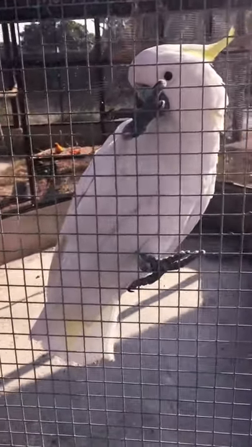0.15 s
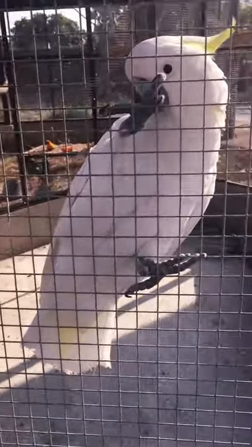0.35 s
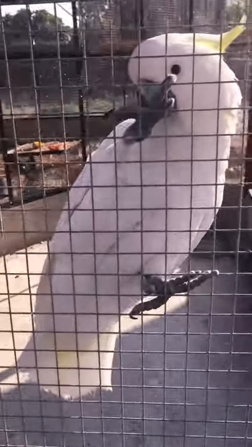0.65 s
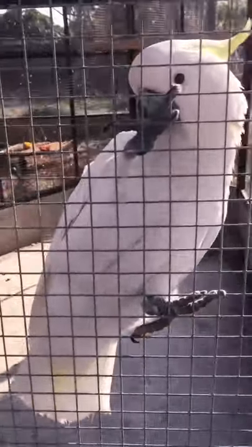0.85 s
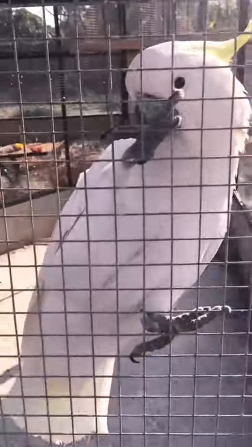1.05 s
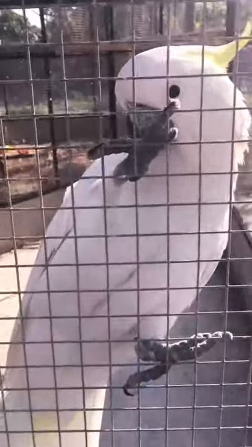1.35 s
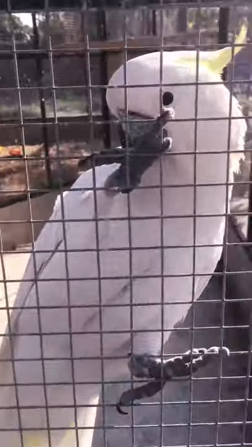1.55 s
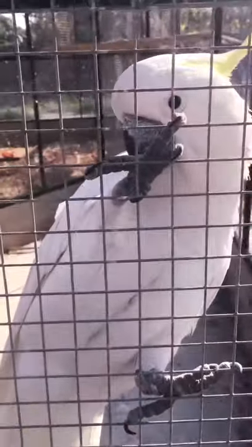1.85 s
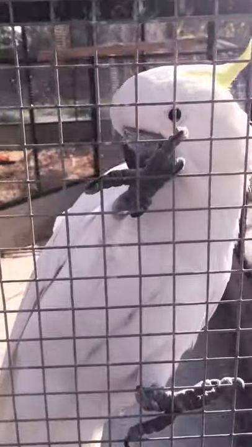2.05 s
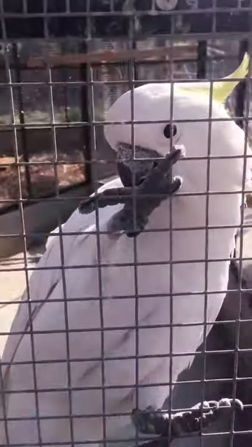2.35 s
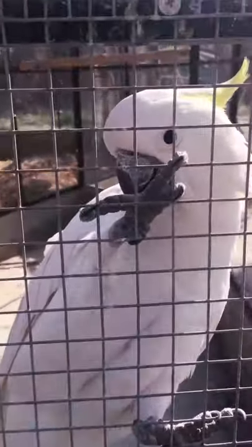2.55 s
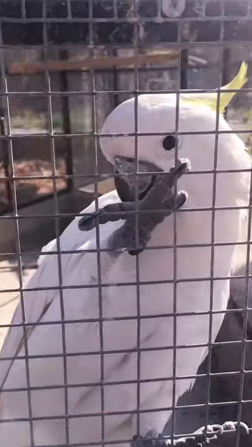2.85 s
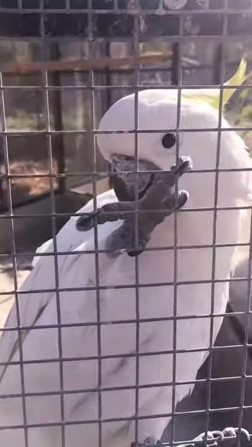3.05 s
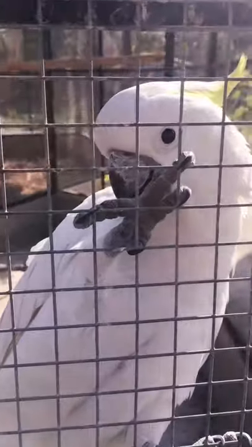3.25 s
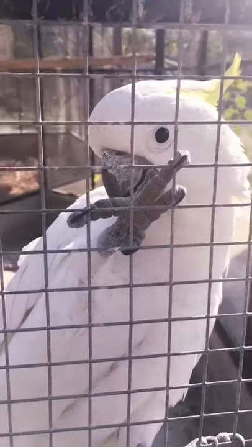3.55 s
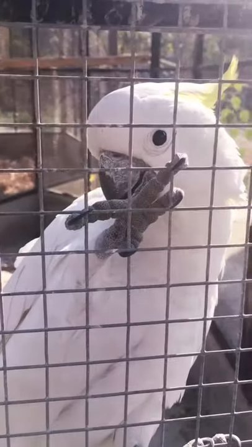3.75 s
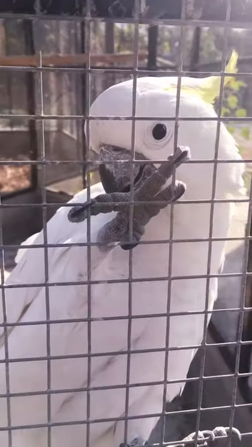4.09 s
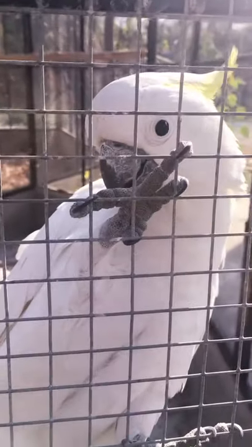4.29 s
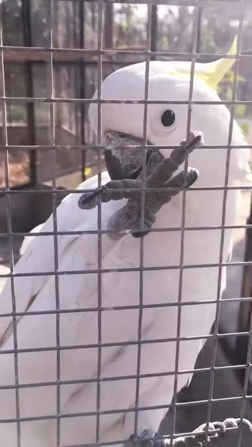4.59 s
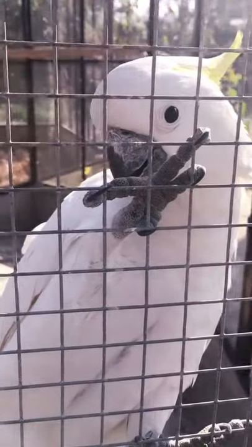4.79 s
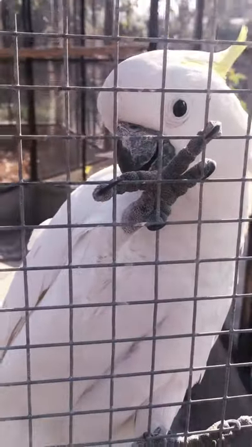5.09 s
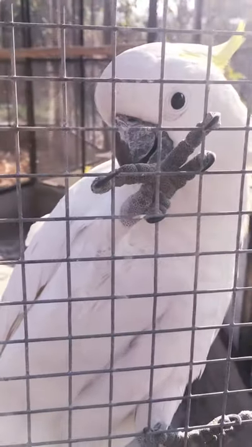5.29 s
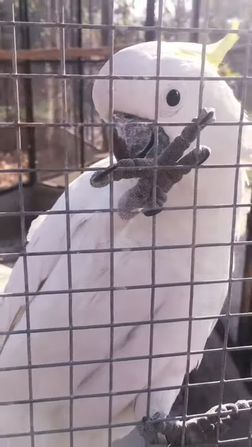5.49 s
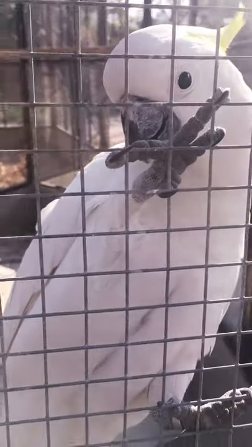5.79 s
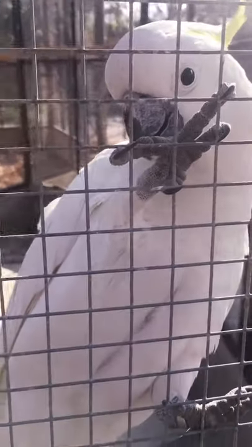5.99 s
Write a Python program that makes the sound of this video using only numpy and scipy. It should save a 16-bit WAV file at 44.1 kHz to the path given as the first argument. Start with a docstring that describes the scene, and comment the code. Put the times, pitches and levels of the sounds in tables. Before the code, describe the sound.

A crisp beak crack opens over faint air, low wavering hum and distant bird cries. Thin shrieks come first, then harsh screeches that grow into a loud run around two seconds. A falling whistle, low squawks and thinner shrieks follow more sparsely, with close food cracks and crumb ticks. A last screech and a sudden close croak end it. Calls ring briefly off the pens; the beak is close to the microphone.

```python
"""A low, wavering machine hum and soft air open the scene, with far birds calling over them.
The bird at the wire cracks food in its beak; a burst of crumb ticks follows late on.
Cockatoos in the aviary give thin shrieks, harsh screeches, falling whistles and lower squawks:
a syrinx claps once a cycle into a throat filter, unevenly where the voice rasps.
A close croak starts at the end. The walls of the pens ring after every call."""
import sys
import numpy as np
from scipy import signal
from scipy.fft import rfft, irfft, next_fast_len
from scipy.io import wavfile
from scipy.ndimage import uniform_filter1d, map_coordinates

SR = 44100
rng = np.random.default_rng(int(sys.argv[2]) if len(sys.argv) > 2 else 0)


def to_wav(s):
    """Save 16-bit WAV."""
    ch = np.atleast_2d(s).T  # columns
    pcm = np.round(np.clip(ch, -1, 1) * 32767)  # PCM
    wavfile.write(sys.argv[1], SR, pcm.astype(np.int16))


N = 270333
TOP_HZ = 15950  # upper edge of the whole scene


def amp(db):
    """Decibels to gain."""
    return 10 ** (np.asarray(db) / 20)


def unit(x):
    """x at rms 1."""
    return x / np.sqrt(np.mean(x ** 2) + 1e-20)


def steady(x, size=900):
    """x at a running rms of 1, over a window of size samples."""
    power = np.abs(uniform_filter1d(x ** 2, size))
    return x / np.sqrt(power + 1e-6 * power.mean() + 1e-20)


def along(points, hz):
    """Read (f/Hz, value) points on a log frequency axis."""
    f, v = np.transpose(points)
    return np.interp(np.log(hz + 1), np.log(f + 1), v)


def wobble(rate, n):
    """A smooth random curve of n samples, rate knots a second."""
    knots = rng.standard_normal(int(n * rate / SR) + 4)
    return map_coordinates(knots, [np.arange(n) * rate / SR])


def add(track, s, x):
    """Mix x into the track at time s."""
    part = track[max(0, round(s * SR)):][:len(x)]
    part += x[:len(part)]


def coloured(x, points):
    """x through a causal minimum-phase filter with the given (f/Hz, level/dB) shape."""
    m = 2 * next_fast_len(len(x) // 2 + 2048)
    cepstrum = irfft(np.log(amp(along(points, np.fft.rfftfreq(m, 1 / SR)))))
    # folding the cepstrum forward in time makes the filter causal
    cepstrum[1:m // 2] *= 2
    cepstrum[m // 2 + 1:] = 0
    return irfft(rfft(x, m) * np.exp(rfft(cepstrum)))[:len(x)]


def band(x, hz, kind, order=3):
    """The part of x below ("low") or above ("high") an edge."""
    return signal.sosfiltfilt(signal.butter(order, hz, kind, fs=SR, output="sos"), x)


def faded(x, fade):
    """x with soft ends, fade seconds each."""
    t = np.arange(len(x)) / SR
    return x * np.clip(np.minimum(t, t[::-1]) / fade, 0, 1)


def ramp(t, span):
    """1 at t = 0, falling to 0 at t = span."""
    return np.clip(1 - t / span, 0, 1)


def pulses(at, sizes, n):
    """Band-limited pulses at fractional sample positions."""
    taps = np.floor(at)[:, None] + np.arange(-7, 9)
    d = taps - at[:, None]
    shape = np.sinc(d) * np.cos(np.pi * d / 16) ** 2
    slots = np.clip(taps, 0, n).astype(int)
    return np.bincount(slots.ravel(), (sizes[:, None] * shape).ravel(), n + 1)[:n]


AIR_DB = -55
# spectrum of the outdoor air, relative: (f/Hz, level/dB per Hz)
AIR_SPECTRUM = [(20, -41), (35, -11.5), (55, 7.5), (90, -4), (130, -9.5), (230, -9), (350, -15.5),
                (500, -17), (900, -14.5), (2100, -20.5), (3900, -19), (5000, -22.5), (7000, -30),
                (15500, -41)]
# hum lines of the machines: (f/Hz, rms level at first/dB, rms level at last/dB)
HUM_LINES = [(57.2, -65.5, -76), (72, -84.5, -48.5), (163.7, -59, -84.5), (221, -72, -78.5),
             (325, -69, -102)]


def background():
    """Soft outdoor air is coloured noise; the machine hum is sine lines wavering in phase and level."""
    t = np.arange(N) / SR
    noise = unit(coloured(rng.standard_normal(N), AIR_SPECTRUM))
    air = amp(AIR_DB + 0.68 * wobble(3.8, N)) * noise
    hum = np.zeros(N)
    for hz, first_db, last_db in HUM_LINES:
        line = unit(np.sin(2 * np.pi * hz * t + 0.26 * wobble(28, N)))
        level = first_db + (last_db - first_db) * t / t[-1] + 0.36 * wobble(4.7, N)
        hum += amp(level) * line
    return air + hum


# far cries: (t/s, length/s, first f/Hz, last f/Hz, level mid-call before the distance filter/dB,
#  step from overtone to overtone/dB, hoarseness as a share of the pitch)
FAR_CRIES = [ (0.0, 0.15, 733, 632, -55, 1, 0.017), (0.481, 0.085, 1070, 936, -61, -8, 0.03),
             (0.659, 0.17, 768, 627, -49.5, 2.5, 0.006), (2.922, 0.22, 1568, 1230, -35, 3.5, 0.031),
             (3.481, 0.136, 895, 887, -39.5, 2.5, 0.037), (3.596, 0.23, 906, 868, -58.5, -4, 0.045),
             (4.384, 0.061, 3680, 3900, -47, -37, 0.003), (4.44, 0.082, 3810, 3740, -52, -35, 0.003),
             (5.703, 0.056, 810, 1026, -55.5, -13, 0.077), (5.78, 0.11, 1078, 911, -46, -5, 0.089)]
# far coos: (t/s, length/s, f/Hz, level mid-call before the distance filter/dB)
FAR_COOS = [(0.0, 0.23, 223, -61), (0.683, 0.18, 253.3, -59), (2.628, 0.16, 261.6, -63),
            (5.696, 0.23, 219, -64.5)]
COO_STEP_DB, COO_HOARSENESS = -22, 0.02  # from overtone to overtone; share of the pitch
FAR_ARCH_DB = 4.5  # a far call swells by this much to its middle and fades again
# tone colour left by the way from the far birds: (f/Hz, level/dB)
DISTANCE_COLOUR = [(2000, 4.5), (4000, -8), (5500, -11), (9000, -52)]


def far_birds(count=8):
    """Distant cries, coos and peeps: hoarse, wavering tones of up to count harmonics, dulled by distance."""
    track = np.zeros(N)
    coos = [(s, length, hz, hz, db, COO_STEP_DB, COO_HOARSENESS) for s, length, hz, db in FAR_COOS]
    for s, length, first_hz, last_hz, db, step_db, hoarse in FAR_CRIES + coos:
        u = np.linspace(0, 1, int(length * SR))
        pitch = first_hz * (last_hz / first_hz) ** u
        waver = hoarse * wobble(298.8, len(u)) + 0.0138 * wobble(45.3, len(u))
        phase = 2 * np.pi * np.cumsum(pitch * (1 + waver)) / SR
        tone = np.zeros(len(u))
        for k in range(count):
            audible = (k + 1) * pitch < TOP_HZ
            tone += amp(k * step_db) * np.sin((k + 1) * phase) * audible
        level = db - FAR_ARCH_DB * (2 * u - 1) ** 2
        add(track, s, faded(amp(level) * unit(tone), fade=0.026))
    return coloured(track, DISTANCE_COLOUR)


# beak cracks: (t/s, peak level/dB, level of the knock against the snap before BODY_LIFT_DB/dB)
BEAK_CRACKS = [(0.0278, -23, -11.5), (0.8075, -36, -9.5), (3.6333, -38.5, -7), (3.7353, -21, -12.5),
               (3.821, -29, -23), (4.522, -42, 1), (4.5684, -34.5, -23), (4.668, -38, -25),
               (4.6958, -35, -30), (4.785, -40, -21), (5.757, -36, 3)]
BODY_LIFT_DB = 8.5
# colour of the snapping food: (f/Hz, level/dB)
SNAP_COLOUR = [(1500, 5), (4000, -2), (6500, 8), (10000, 6), (16000, 0.5)]
# colour of the knocking beak: (f/Hz, level/dB)
BEAK_COLOUR = [(300, -13), (900, -40), (1700, 5.5), (2400, -12), (3300, 0), (4500, -2.5), (8000, -30)]


def beak(count=30):
    """Food snaps in the beak, which knocks with it; small crumbs tick as the bird chews: all decaying noise."""
    track, t = np.zeros(N), np.arange(SR // 10) / SR

    def burst(t60, colour):
        """Noise that dies by 60 dB in t60 seconds."""
        return coloured(rng.standard_normal(len(t)) * amp(-60 * t / t60), colour)

    for s, db, body_db in BEAK_CRACKS:
        snap = unit(burst(0.018, SNAP_COLOUR))
        knock = unit(burst(0.0083, BEAK_COLOUR))
        crack = snap + amp(body_db + BODY_LIFT_DB) * knock
        add(track, s, amp(db) * crack / np.abs(crack).max())
    for when, size in rng.random((count, 2)):
        tick = burst(0.013, SNAP_COLOUR)
        tick = amp(-48.5 + 13.7 * size ** 2) * tick / np.abs(tick).max()
        add(track, 4.49 + .32 * when, tick)
    return track


def beats(pitch):
    """Sample positions at which each cycle starts."""
    cycles = np.cumsum(pitch) / SR
    return np.interp(np.arange(cycles[-1]), cycles, np.arange(len(pitch)))


def windpipe(x, smear=0.001647, top_hz=8000):
    """The windpipe spreads each clap in time: delay grows with frequency, to smear seconds at top_hz."""
    m = next_fast_len(len(x) + 1024)
    hz = np.fft.rfftfreq(m, 1 / SR)
    return irfft(rfft(x, m) * np.exp(-1j * np.pi * smear * hz ** 2 / top_hz), m)[:len(x)]


def call(controls, throats, tremor, flutter, jitter, scatter_db, hiss,
         treble_hz=6500, mellow_hz=2100, soft_db=-31.0):
    """The syrinx claps once a cycle into the throat; rasp makes the claps uneven in time and size."""
    pitch, db, treble_db, rasp, *half_db = controls
    n, rasp = len(pitch), np.clip(rasp, 0, 1)
    unrest = (tremor + flutter * rasp) * (wobble(420, n) + .8 * wobble(110, n))
    at = beats(pitch * np.exp(unrest))
    here, count = at.astype(int), len(at)
    sizes = amp(scatter_db * np.sqrt(rasp[here]) * rng.standard_normal(count))
    if half_db:  # every other clap is stronger: lines appear halfway between the harmonics
        contrast = amp(half_db[0] + 3.0 * wobble(67.6, n))[here]
        sizes = sizes * (1 + contrast * (-1) ** np.arange(count))
    at = at + jitter * rasp[here] ** 2 * SR / pitch[here] * rng.standard_normal(count)
    claps = steady(windpipe(pulses(at, sizes, n)))
    air = hiss * np.sqrt(rasp) * rng.standard_normal(n)
    source = (claps + air) * amp((1.3 + 1.5 * rasp) * wobble(260, n))
    # the rougher the voice, the more the last throat shape takes over from the first
    slack = np.clip(2 * rasp - .7, 0, 1)
    voice = coloured((1 - slack) * source, throats[0]) + coloured(slack * source, throats[-1])
    # less effort gives a mellower voice
    softness = np.clip((soft_db - db) / 10, 0, 1)
    voice = voice + 1.96 * softness * band(voice, mellow_hz, "low")
    # a wider beak lets out more treble
    low, high = band(voice, treble_hz, "low"), band(voice, treble_hz, "high")
    balanced = steady(steady(low) + amp(treble_db) * steady(high))
    return faded(amp(db) * balanced, fade=.012)


def calls(table, gesture, shape, throats, **roughness):
    """Place all the calls of one kind on a track."""
    track = np.zeros(N)
    for s, *row in table:
        add(track, s, call(gesture(row, **shape), throats, **roughness))
    return track


RASP_TURN_S = 0.019  # time the voice takes to turn from rough to clear or back
WAVER_PER_S, WAVER_DB, WAVER_TREBLE_DB = 35, 0.27, 3  # a cry is never quite steady


def arch(row, scoop, drop, drop_s, attack_s, attack_db, release_db, split_db):
    """One cry: pitch scoops up, sags and drops; level attacks, swells and lets go; rasp changes once."""
    (length, top_hz, rise, sag, db, swell_db, release, treble_db, treble_swell_db,
     first_rasp, last_rasp, turn, half_db) = row
    t = np.arange(int(length * SR)) / SR
    left = length - t
    middle = t / length - .5  # -0.5 at the start, 0.5 at the end
    scooped = top_hz * (1 - scoop * ramp(t, rise) ** 2)
    sagged = scooped * 2 ** (-sag * np.maximum(t - rise, 0))
    pitch = sagged * (1 - drop * ramp(left, drop_s))
    level = db + swell_db * middle
    level = level - attack_db * ramp(t, attack_s) ** 2 - release_db * ramp(left, release)
    level = level + WAVER_DB * wobble(WAVER_PER_S, len(t))
    treble = treble_db + treble_swell_db * middle + WAVER_TREBLE_DB * wobble(WAVER_PER_S, len(t))
    opening = (first_rasp - last_rasp) * (1 - np.tanh((t - turn) / RASP_TURN_S)) / 2
    return pitch, level, treble, last_rasp + opening, half_db + split_db * opening


# thin shrieks: (t/s, length/s, top f/Hz, rise/s, sag/octaves per s, level mid-call/dB,
#  swell from start to end/dB, release/s, treble share/dB, treble swell/dB, opening rasp 0-1,
#  closing rasp 0-1, time of the rasp change/s, half-pitch lines before the split/dB)
SHRIEK_CALLS = [ (0.267, 0.12, 2300, 0.044, 0.32, -43, 7, 0.02, -9.5, -3, 1, 0.23, 0.022, -26),
                (0.375, 0.1, 2357, 0.0094, 0.33, -39, -5, 0.052, -3.5, -11, 0.6, 0.55, 0.037, -6),
                (3.42, 0.16, 2846, 0.1, 0.6, -34.5, 12.5, 0.071, -9, 0, 0.57, 0.32, 0.078, -16),
                (4.71, 0.11, 3830, 0.07, 0, -51.5, 4, 0.047, -13, 0, 0.79, 0.3, 0.067, -27),
                (4.8, 0.081, 4220, 0.0108, 0.051, -53.5, 6, 0.012, -15, 6, 0.6, 0.88, 0.0311, -12),
                (5.018, 0.17, 2620, 0.015, 0.066, -37.5, 7.5, 0.025, -10, -4, 0.56, 0.29, 0.13, -14)]
# start and end of a shriek: pitch shares lost at the start (scoop) and end (drop), ramp times/s,
# ramp depths/dB, and how much a rough opening strengthens the half-pitch lines (split)/dB
SHRIEK_ENDS = dict(scoop=0.17, drop=0.019, drop_s=0.032, attack_s=0.037, attack_db=2.5, release_db=22.5, split_db=-3)
# throat and beak colour of a clear shriek: (f/Hz, level/dB)
SHRIEK_CLEAR = [(900, -30.5), (1800, -17.5), (2500, -20), (3400, 7), (4500, 4), (5500, 4), (6400, -17.5),
                (8000, -15), (9800, -6.5), (11000, -31), (16000, -27)]
# throat and beak colour of a rasping shriek: (f/Hz, level/dB)
SHRIEK_ROUGH = [(900, -18), (1800, -28), (2450, 8.5), (3400, 10), (4500, 2.5), (5500, -5), (6400, -3.5),
                (7300, -9), (9800, -25), (11000, -20), (16000, -49)]


def shrieks():
    """Thin high cries: fast claps with strong jitter through a clear and a rough throat."""
    return calls(SHRIEK_CALLS, arch, SHRIEK_ENDS, [SHRIEK_CLEAR, SHRIEK_ROUGH],
                 tremor=.012, flutter=.06, jitter=.12, scatter_db=6, hiss=.25)


# harsh screeches, t/s to half-pitch lines/dB: columns and units as in SHRIEK_CALLS
SCREECH_CALLS = [ (0.903, 0.26, 1901, 0.22, 0.12, -42, 4.5, 0.032, -15.5, -27, 0.86, 0.29, 0.14, -13),
                 (1.377, 0.29, 2028, 0.13, 0.159, -30, -1, 0.0091, -5, 6.5, 0.9, 0.17, 0.12, -12),
                 (1.5, 0.185, 1661, 0.015, 0.09, -33.5, -26, 0.006, -9, -5, 0.79, 0.34, 0.067, -36),
                 (1.9, 0.23, 1889, 0.087, 0.082, -22, -1, 0.016, -11.5, 4, 0.99, 0.06, 0.024, -5.5),
                 (2.085, 0.21, 2266, 0.07, 1.25, -21, 6, 0.073, -5, 9, 0.43, 0.24, 0.082, -10.5),
                 (2.352, 0.31, 2133, 0.085, 0.55, -20.5, 7, 0.12, -7, 5, 0.8, 0.25, 0.053, -7.5),
                 (5.783, 0.19, 2071, 0.14, 0.84, -27, 5.5, 0.0087, -7, 11, 1, 0.28, 0.11, -12)]
# start and end of a screech: settings and units as in SHRIEK_ENDS
SCREECH_ENDS = dict(scoop=0.25, drop=0.122, drop_s=0.0306, attack_s=0.061, attack_db=18, release_db=16, split_db=4)
# throat and beak colour of a screech that sings clear: (f/Hz, level/dB)
SCREECH_CLEAR = [(400, -79), (700, -81), (1050, -26), (1500, -15), (2000, -4.5), (2500, -13), (3050, -4.5),
                 (3800, 1), (4350, 1), (4950, -7), (6200, -8), (8000, -17), (10000, -26.5), (16000, -43)]
# throat and beak colour of a screech that rasps: (f/Hz, level/dB)
SCREECH_ROUGH = [(400, -32), (650, -39), (950, -15), (1400, -3.5), (1900, -6), (2350, -1.5), (3200, 5),
                 (4000, -2), (4700, -6.5), (5600, -6), (8000, -14.5), (11000, -27.5), (16000, -47)]


def screeches():
    """Harsh high cries: the throat passes between its rough and its clear shape as the rasp changes."""
    return calls(SCREECH_CALLS, arch, SCREECH_ENDS, [SCREECH_CLEAR, SCREECH_ROUGH],
                 tremor=.004, flutter=.045, jitter=.07, scatter_db=5, hiss=.1)


# path of a whistle's pitch: (share of the length, share of the glide)
GLIDE_PATH = [(0, 0), (0.22, 0.17), (0.43, 0.55), (0.85, 0.89), (1, 1)]
WHISTLE_ATTACK_S, WHISTLE_ATTACK_DB = 0.017, 6


def glide(row):
    """One whistle: it slides from its first pitch to its last while its level changes steadily."""
    length, first_hz, last_hz, db, fade_db, treble_db, rasp = row
    t = np.arange(int(length * SR)) / SR
    pitch = first_hz * (last_hz / first_hz) ** np.interp(t / length, *np.transpose(GLIDE_PATH))
    level = db - fade_db * t / length - WHISTLE_ATTACK_DB * ramp(t, WHISTLE_ATTACK_S)
    return pitch, level, treble_db, np.full(len(t), rasp)


# whistles: (t/s, length/s, first f/Hz, last f/Hz, level before attack and fade/dB,
#  fade from start to end/dB, treble share/dB, rasp 0-1)
WHISTLE_CALLS = [ (2.75, 0.028, 2390, 2690, -33.5, 7, -22, 0.08),
                 (2.781, 0.169, 3143, 1172, -28.5, 17, -17, 0.01),
                 (4.14, 0.105, 1182, 882, -35, 16, -21, 0.04),
                 (4.875, 0.145, 1715, 1071, -50.5, -2.5, -22, 0.19)]
# throat and beak colour of a whistle: (f/Hz, level/dB)
WHISTLE_COLOUR = [(500, -33), (1000, -1.5), (1500, -15), (2200, 11), (2800, 4), (3800, 0.5), (6000, -10),
                  (8500, -19.5), (12000, -42), (16000, -39)]


def whistles():
    """Gliding, mostly falling calls with little rasp, through one throat shape."""
    return calls(WHISTLE_CALLS, glide, {}, [WHISTLE_COLOUR],
                 tremor=.01, flutter=.07, jitter=.15, scatter_db=6, hiss=.4)


# low squawks, t/s to half-pitch lines/dB: columns and units as in SHRIEK_CALLS
SQUAWK_CALLS = [ (3.223, 0.18, 664, 0.078, 0.095, -29, 5.8, 0.042, -6.5, 0, 0.13, 0.88, 0.11, -22),
                (3.92, 0.24, 723.4, 0.175, 0.36, -34.5, 12, 0.055, -12, -3, 0.17, 0.43, 0.17, -28),
                (5.238, 0.21, 700.7, 0.13, 0.325, -27.5, 6, 0.066, -7.5, 1, 0.58, 0.496, 0.092, -24)]
# start and end of a squawk: settings and units as in SHRIEK_ENDS
SQUAWK_ENDS = dict(scoop=0.36, drop=0.081, drop_s=0.03915, attack_s=0.088, attack_db=12, release_db=19.5, split_db=0)
# throat and beak colour of a squawk: (f/Hz, level/dB)
SQUAWK_COLOUR = [(300, -22), (500, -18.5), (700, -12), (1000, -2), (1400, -7.5), (2100, -1.5), (2900, 4.5),
                 (3600, 5), (4500, -3.5), (5500, 0), (8500, -13), (10800, -29.5), (13800, -28.5),
                 (16000, -33)]


def squawks():
    """Lower cries: slower claps and breathy hiss through one throat shape."""
    return calls(SQUAWK_CALLS, arch, SQUAWK_ENDS, [SQUAWK_COLOUR],
                 tremor=.005, flutter=.05, jitter=.06, scatter_db=3.5, hiss=.38)


# bursts of the close croak: (t/s, length/s, claps per s, level of the first clap/dB)
CROAK_BURSTS = [(6.088, 0.008, 209.6, -10), (6.1077, 0.025, 210, -11)]
# throat resonances of the croak: (f/Hz, width/Hz, level before weighting by the width/dB)
CROAK_RESONANCES = [(1326, 30, 24), (1690, 96, 3), (2890, 150, -4.5), (3700, 350, -27), (260, 180, -29)]
CROAK_FADE_DB_PER_S, CROAK_TOP_HZ = 292, 4940


def croak():
    """Short bursts of slow, fading claps, each ringing the throat, with one strong resonance."""
    track, t = np.zeros(N), np.arange(SR // 20) / SR
    ring = np.zeros(len(t))
    for hz, width, level in CROAK_RESONANCES:
        ring += amp(level) * width * np.exp(-np.pi * width * t) * np.sin(2 * np.pi * hz * t)
    ring = ring / np.abs(ring).max()
    for s, length, rate, db in CROAK_BURSTS:
        at = np.arange(0, length, 1 / rate)
        claps = pulses(at * SR, amp(db - CROAK_FADE_DB_PER_S * at), len(t))
        add(track, s, signal.fftconvolve(claps, ring))
    return band(track, CROAK_TOP_HZ, "low")


def walls(x, count=30):
    """Weak early copies from the floor and nearby walls."""
    out = np.zeros(N)
    for when, size in rng.random((count, 2)):
        add(out, .003 + .035 * when ** 1.5, x * (2 * size - 1))
    return out / np.sqrt(count)


# ringing of the pens: (f/Hz, time to fall by 60 dB/s)
PEN_DECAY = [(200, 0.75), (1500, 0.66), (4000, 0.45), (8000, 0.33), (15000, 0.31)]


def pens(x, delay=.006):
    """The aviary's echo: a noise tail in which each frequency dies at its own speed."""
    hz, t, z = signal.stft(rng.standard_normal(SR), SR, nperseg=256)
    decay = amp(-60 * t / along(PEN_DECAY, hz)[:, None])
    tail = signal.istft(z * decay, SR, nperseg=256)[1]
    tail = np.pad(tail / np.linalg.norm(tail), (int(delay * SR), 0))
    return signal.fftconvolve(x, tail)[:N]


def scene():
    """Near and far birds in one enclosure, over air and hum."""
    bed, far = background(), far_birds()
    near = beak() + croak()
    birds = shrieks() + screeches() + whistles() + squawks()
    early = amp(2) * walls(birds)
    echo = pens(amp(-8.5) * birds + amp(-8.5) * far + amp(-5.5) * near)
    return (birds + early + far + near + echo + bed)[None]


def record(dry):
    """Band limit: nothing passes from TOP_HZ up."""
    m = next_fast_len(N + SR // 2)
    passed = np.fft.rfftfreq(m, 1 / SR) < TOP_HZ
    return irfft(rfft(dry, m) * passed, m)[..., :N]


dry = scene()
out = record(dry)
to_wav(out)
```